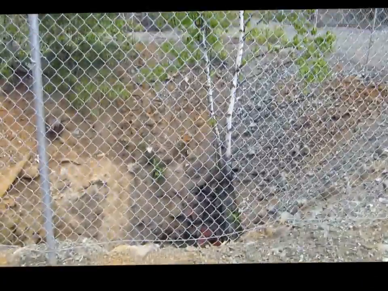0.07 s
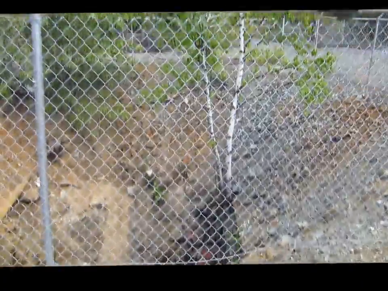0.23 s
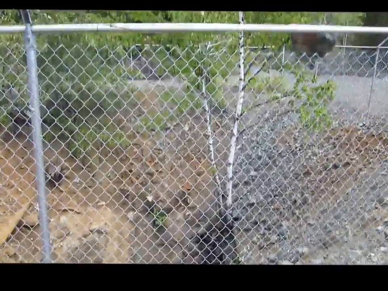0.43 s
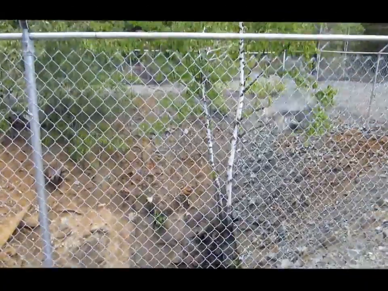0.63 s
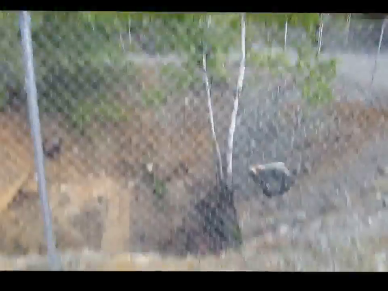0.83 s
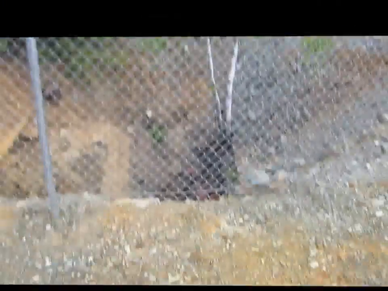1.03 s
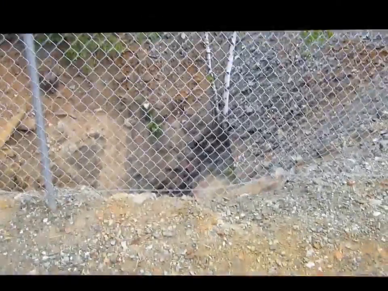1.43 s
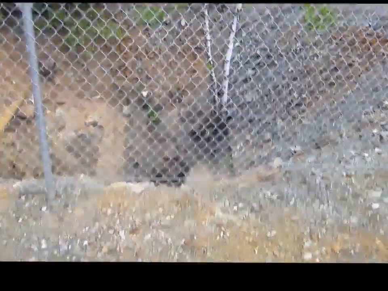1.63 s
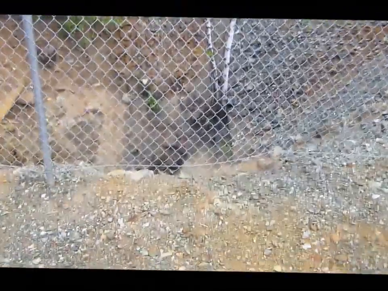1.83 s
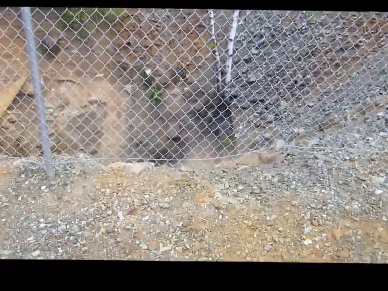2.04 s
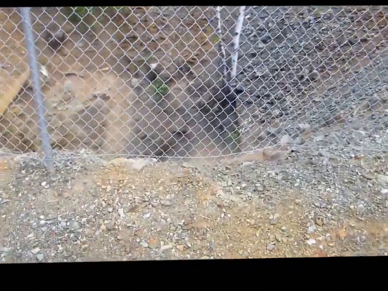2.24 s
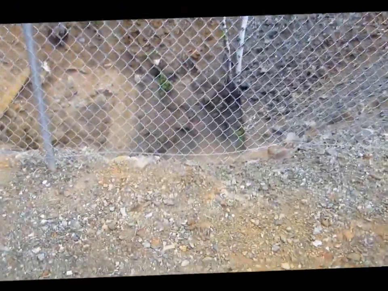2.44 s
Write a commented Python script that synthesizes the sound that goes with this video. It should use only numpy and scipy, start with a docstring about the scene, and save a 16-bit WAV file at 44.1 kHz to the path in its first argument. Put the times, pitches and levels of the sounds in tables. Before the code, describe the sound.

Outdoors, a jolted chain-link fence gives a loud metallic rattle and sways on with light jingling and ringing wires. A rock lands with a sharp crack and bounces down a slope with several knocks and one low boom.

```python
"""A chain-link fence clashes, jolted as a rock is thrown over it into a pit, outdoors.
The mesh sways on: its links chafe, tick and clink, and its wires chirp and ring.
The rock cracks on the stony rim, then knocks and thuds on down the slope, with one deep boom.
A faint outdoor rumble lies underneath."""
import sys
import numpy as np
from scipy import signal
from scipy.fft import rfft, irfft
from scipy.io import wavfile
from scipy.ndimage import map_coordinates

SR = 44100
rng = np.random.default_rng(int(sys.argv[2]) if len(sys.argv) > 2 else 0)


def dump(signal):
    """Clip the signal to [-1, 1] and save it as 16-bit WAV at the path in sys.argv[1]."""
    limited = np.clip(np.atleast_2d(signal).T, -1, 1)
    pcm = np.round(limited * 32767).astype(np.int16)
    wavfile.write(sys.argv[1], SR, pcm)


N = 110250
T = np.arange(N) / SR
CHAFE_CONTACTS_PER_S, CHAFE_SPREAD_DB = 5000, 2.5

# sheets of links slapping together: start_s, body_db, treble_db, rise_s, t60_s
CLASHES = [(0.188, -33, -33, 0.01, 0.29), (0.206, -34, -31, 0.0093, 0.28), (0.246, -24, -20, 0.0036, 0.15),
           (0.268, -34, -23, 0.0088, 0.23), (0.286, -14.5, -17, 0.0033, .12),
           (0.303, -14.5, -30, 0.0065, 0.22), (0.332, -18, -24, 0.011, 0.092),
           (0.386, -23, -37, 0.0026, 0.14), (0.423, -24, -42, 0.0058, 0.28),
           (0.45, -22.5, -22.5, 0.02, 0.12), (0.545, -20.5, -29, 0.0011, 0.089),
           (0.598, -19.5, -29.5, 0.0016, 0.12), (0.624, -34, -36.5, 0.0038, 0.51),
           (0.839, -37, -32.5, 0.0069, 0.26), (0.879, -36.5, -31.5, .002, 0.14),
           (1.011, -61, -33, 0.0099, 0.26), (1.748, -30.5, -47, 0.0025, 0.085),
           (1.972, -27.5, -43, 0.0018, 0.044), (2.235, -34, -67, 0.036, 0.26)]
# spectrum of rubbing links: freq_hz, level_db
CHAFE_COLOUR = [(100, -46), (300, -7.5), (500, -12), (850, -1.5), (1700, 0.5), (2750, 1.5), (3500, 0),
                (4400, 2.5), (5600, 0.5), (7500, -6.5), (10500, -3.5), (11800, -5.5), (13500, -9.5),
                (15500, -17.5)]


def from_db(db):
    """Decibels to gain."""
    return 10 ** (np.asarray(db) / 20)


def rms_one(x):
    """Scale to rms 1."""
    return x / np.sqrt(np.mean(x ** 2) + 1e-20)


def colour(x, spectrum):
    """Shape x by (freq_hz, level_db) points; rms 1."""
    hz, db = np.transpose(spectrum)
    bins_hz = np.maximum(np.arange(N // 2 + 1) * SR / N, 1)
    gain = from_db(np.interp(np.log(bins_hz), np.log(hz), db))
    return rms_one(irfft(rfft(x) * gain, N))


def noise(spectrum):
    """Coloured noise; rms 1."""
    return colour(rng.standard_normal(N), spectrum)


def contacts(per_s, spread_db):
    """Random clicks of uneven size; rms 1."""
    sizes = from_db(spread_db * np.minimum(rng.exponential(1, N), 5)) * rng.choice([-1, 1], N)
    return rms_one(sizes * (rng.random(N) < per_s / SR))


def clicks(times_s, gains):
    """One click at each time."""
    return np.bincount((np.asarray(times_s) * SR).astype(int), gains, N)[:N]


def burst(start_s, t60_s, rise_s=0):
    """Envelope: linear rise to 1, exponential decay."""
    rise_s = max(rise_s, 1 / SR)
    attack = np.clip((T - start_s) / rise_s, 0, 1)
    return attack * np.exp(-np.log(1000) * np.clip((T - start_s - rise_s) / t60_s, 0, 10))


def ring(x, hz, t60_s):
    """One mode: a unit click starts a decaying sine of height 1."""
    r, w = np.exp(-np.log(1000) / (t60_s * SR)), 2 * np.pi * hz / SR
    return signal.lfilter([0, np.sin(w)], [1, -2 * r * np.cos(w), r * r], x + 1e-18)


def air():
    """Low outdoor rumble, ducked after the fence crash and recovering, as by a recorder's gain control."""
    # gain dip and recovery: time_s, level_db
    ducking = [(0.1, -52.5), (0.75, -62.5), (1.4, -56.5), (1.65, -50), (2.5, -51)]
    # rumble spectrum: freq_hz, level_db
    spectrum = [(20, -5), (70, -5), (170, -5), (290, -2.5), (480, -5.5), (3000, -17.5), (15000, -23)]
    return from_db(np.interp(T, *np.transpose(ducking))) * noise(spectrum)


def jingle(link_count=90):
    """Small strikes land at random on many links, each with its own pitch; rms 1."""
    strikes = contacts(per_s=240, spread_db=1.0)
    struck_link = rng.integers(0, link_count, N)
    pitches_hz = rng.uniform(1203, 13500, link_count)
    rings = sum(ring(strikes * (struck_link == k), hz, t60_s=0.13) for k, hz in enumerate(pitches_hz))
    return colour(rings, CHAFE_COLOUR)


def chafing(flurry_share=.45):
    """Links rub in small flurries as the mesh sways, and keep the wire singing."""
    # rubbing envelope: time_s, level_db
    sway = [(0, -48.5), (.06, -51.5), (.18, -52.5), (.25, -30.5), (.52, -34.5), (.66, -33.5), (.76, -38),
            (.92, -37.5), (1.15, -36), (1.26, -38), (1.55, -39), (1.6, -36), (1.72, -38.5), (1.89, -36.5),
            (2.08, -39.5), (2.27, -38.5), (2.315, -46.5), (2.42, -39), (2.5, -46)]
    # rubbed wire modes: pitch_hz, relative_db, t60_s
    modes = [(2783, -20, .1), (4115, -11.5, .3), (5491, -26, .2), (11570, -19, .1)]
    starts = np.abs(contacts(per_s=110, spread_db=2.0))
    flurries = np.abs(signal.fftconvolve(starts, burst(0, t60_s=.1) ** 2)[:N])
    flutter = np.sqrt(1 - flurry_share + flurry_share * flurries / flurries.mean())
    level = from_db(np.interp(T, *np.transpose(sway))) * flutter
    grain = contacts(CHAFE_CONTACTS_PER_S, CHAFE_SPREAD_DB)
    out = level * (colour(grain, CHAFE_COLOUR) + from_db(-4) * jingle())
    drive = level * grain * (T > CLASHES[0][0])  # from the first clash on
    for hz, db, t60_s in modes:
        to_drive_rms = np.sqrt(4 * np.log(1000) / (t60_s * SR))
        out += from_db(db) * to_drive_rms * ring(drive, hz, t60_s)
    return out


def clinks():
    """Loose links chatter briefly, each group around its own pitch."""
    # link groups: start_s, pitch_hz, width_hz, level_db, t60_s
    groups = [(.079, 11500, 2600, -45, 0.32), (0.209, 2860, 400, -24, .2), (.268, 3780, 450, -24, 0.15),
              (1.047, 9100, 400, -31, 0.032), (1.324, 2804, 200, -34, 0.13),
              (1.615, 10860, 500, -30, 0.043), (1.615, 5560, 1300, -32, 0.091),
              (2.127, 4520, 500, -28.5, 0.15)]
    out = np.zeros(N)
    for start_s, hz, width_hz, db, t60_s in groups:
        band = signal.butter(2, [hz - width_hz / 2, hz + width_hz / 2], "band", fs=SR, output="sos")
        chatter = rms_one(signal.sosfilt(band, rng.standard_normal(N)))
        out += from_db(db) * burst(start_s, t60_s, rise_s=0.0039) * chatter
    return out


def wire_cluster(times_s, strike_db, lowest_hz, step_hz, loss_db, t60_s):
    """Ten close, beating wire modes; higher ones lie wider apart, are weaker and die sooner."""
    out = np.zeros(N)
    for k in range(10):
        late_s, uneven_db = rng.uniform([0, -2], [.003, 2], (len(times_s), 2)).T
        strikes = clicks(times_s + late_s, from_db(strike_db - loss_db * k + uneven_db))
        out += ring(strikes, lowest_hz + step_hz * k ** 1.45, t60_s / (1 + k / 2))
    return out


def waver(x, depth_s=.00002, rate_hz=11):
    """Swaying changes the wire's tension, so its pitch wanders slightly."""
    lowpass = signal.butter(2, rate_hz, fs=SR, output="sos")
    drift = rms_one(signal.sosfilt(lowpass, rng.standard_normal(N)))
    return map_coordinates(x, [(T + depth_s * drift) * SR], order=5, mode="nearest")


def ticks():
    """A slipping link rings two mode clusters and shakes a spray of contacts from its neighbours."""
    # link slips, levels before each part's trim: start_s, spray_db, low_ring_db, high_ring_db
    slips = [(0.249, -28, -35, -34), (0.287, -6.5, -18.5, -19), (0.3485, -18, -22.5, -23),
             (0.4214, -14, -42, -25), (0.4553, -16.5, -22, -23), (0.597, -21, -26, -29),
             (0.7707, -31, -29.5, -25), (0.901, -16, -29, -20.5), (0.932, -25, -29, -21.5),
             (0.9564, -39, -25, -23), (1.144, -24, -31, -49), (1.2191, -29, -34.5, -32.5),
             (1.344, -17, -35, -37), (1.4552, -44, -31.5, -29.5), (1.616, -20, -35, -41),
             (1.7718, -20, -35.5, -31), (1.8577, -19, -28.5, -27), (1.8806, -14, -27.5, -32),
             (1.9189, -23, -29.5, -34), (1.9565, -21, -27.5, -31), (2.0106, -33, -30.5, -50),
             (2.128, -14, -25.5, -25), (2.1656, -24, -26, -40), (2.18, -21, -28, -25.5),
             (2.3306, -21, -32, -34.5), (2.357, -43, -31, -40)]
    # spray spectrum: freq_hz, level_db
    spray_colour = [(300, -15), (2800, 8), (3700, -2), (4600, 5), (7500, 1), (12000, 3), (15500, -15)]
    times_s, spray_db, low_db, high_db = np.transpose(slips)
    low = wire_cluster(times_s, low_db - 5.3, lowest_hz=4106, step_hz=28, loss_db=2.0, t60_s=.62)
    high = wire_cluster(times_s, high_db - 7.5, lowest_hz=11550, step_hz=38, loss_db=1.0, t60_s=.13)
    rings = waver(low + high)
    spray_power = sum((from_db(db - 12.5) * burst(start_s, t60_s=.1, rise_s=0.0024)) ** 2
                      for start_s, db in zip(times_s, spray_db))
    spray = colour(contacts(CHAFE_CONTACTS_PER_S, CHAFE_SPREAD_DB), spray_colour)
    return rings + np.sqrt(spray_power) * spray


def zings(low_hz=4080, high_hz=11360, travel_s=0.001133):
    """High waves run faster along a taut wire, so a snap arrives as a chirp falling to its pitch."""
    # wire snaps: start_s, low_db, high_db
    snaps = [(0.287, -6, -12), (.331, -0.5, -22), (.349, -5.5, -13), (0.385, -8.5, -24), (.901, -15.5, -20),
             (1.7732, -26, -13), (2.128, -27, -24)]
    times_s, low_db, high_db = np.transpose(snaps)
    dispersed_s = np.sqrt(T * (T + 2 * travel_s))
    fade = burst(0, t60_s=0.017) * np.sqrt(travel_s / (T + travel_s))
    out = np.zeros(N)
    for hz, db, cutoff_hz in ((low_hz, low_db, 7500), (high_hz, high_db, 14000)):
        pitch_hz = hz * (T + travel_s) / (dispersed_s + 1e-9)
        chirp = np.sin(2 * np.pi * hz * dispersed_s) * fade / (1 + (pitch_hz / cutoff_hz) ** 10)
        out += signal.fftconvolve(clicks(times_s, from_db(db)), chirp)[:N]
    return out


def clashes(crossover_hz=5280, frame_db=-44):
    """Swarms of link contacts swell and die, and set the frame ringing."""
    # swarm spectrum: freq_hz, level_db
    spectrum = [(40, -24), (120, -23.5), (290, -10), (500, -18), (720, -6.5), (1220, -4.5), (1900, -1.5),
                (2640, -1), (3400, -5.5), (4400, -2), (6000, -5), (8300, -14.5), (10500, -9.5),
                (11800, -10.5), (13500, -17), (15500, -23)]
    # modes of the frame and stretched wires: pitch_hz, relative_db
    modes = [(1193, 0), (1796, -2), (2040, -2), (2567, -1), (2609, -2), (2704, 0), (3807, -1), (4469, -1),
             (4596, -2), (4772, 2)]
    swarm = colour(contacts(per_s=22000, spread_db=2), spectrum)
    body = signal.sosfiltfilt(signal.butter(2, crossover_hz, fs=SR, output="sos"), swarm)
    body_power, treble_power = np.zeros((2, N))
    for start_s, body_db, treble_db, rise_s, t60_s in CLASHES:
        envelope = burst(start_s, t60_s, rise_s)
        body_power += (from_db(body_db) * envelope) ** 2
        treble_power += (from_db(treble_db) * envelope) ** 2
    mesh = np.sqrt(body_power) * rms_one(body) + np.sqrt(treble_power) * rms_one(swarm - body)
    drive = np.sqrt(body_power) * rng.standard_normal(N)
    frame = sum(from_db(db) * rms_one(ring(drive, hz, t60_s=.2)) for hz, db in modes)
    return mesh + from_db(frame_db) * rms_one(frame)


def boom(start_s=1.592, pitch_hz=65, level_db=-33):
    """A deep boom from the pit: one low, quickly damped swell."""
    tone = np.sin(2 * np.pi * pitch_hz * (T - start_s))
    return from_db(level_db) * burst(start_s, t60_s=.14, rise_s=.02) * tone


def pressure_pulse(hit, pitch_hz, t60_cycles=2.9):
    """A blow's push and pull on the air, a few cycles long, without bass."""
    band_hz = np.clip([0.6 * pitch_hz, 4.5 * pitch_hz], 20, SR / 3)
    push = signal.sosfilt(signal.butter(2, band_hz, "band", fs=SR, output="sos"), hit + 1e-18)
    return ring(push, pitch_hz, t60_cycles / pitch_hz)


def rock(stone_relative_db=-24.5, gravel_relative_db=-28):
    """Blows and one echo: pressure pulse, stony ring, crushed grit, scattered gravel, ground thud."""
    # rock impacts, plus a short echo at 1.114 s just after the main crack:
    # start_s, level_db, pitch_hz, grit_relative_db, thud_db
    blows_and_echo = [(1.1031, -9.5, 3640, 0.5, -60), (1.1042, 6.5, 2000, -5, -31),
                      (1.114, -15, 2500, -3, -53), (1.295, -19, 835, -20, -58), (1.349, -29, 375, -24, -66),
                      (1.485, -14.5, 1350, -25, -47), (1.4884, -14.5, 1440, -26, -47),
                      (1.597, -27, 510, -10, -38), (1.759, -28, 473, -12, -39.5),
                      (1.960, -13, 900, -24, -48), (2.189, -26, 690, -8, -70),
                      (2.2495, -8, 1000, -27, -41.5)]
    # modes of the struck stone: pitch_hz, relative_db, t60_s
    modes = [(930, 0, .022), (2600, 4, .009), (3270, 3, .014)]
    # grit, gravel and ground spectra: freq_hz, level_db
    grit_colour = [(500, -10), (3500, 11), (6500, 3.5), (10500, 10.5), (13000, -1), (15500, -11)]
    gravel_colour = [(150, -6), (650, -18), (900, 6), (2200, 10), (3300, -2), (5500, -7), (14000, -31)]
    thud_colour = [(25, -6), (60, -1), (120, 2), (260, -2), (450, -9.5), (1200, -22.5)]
    grit, gravel, thud = noise(grit_colour), noise(gravel_colour), noise(thud_colour)
    out = np.zeros(N)
    for start_s, db, pitch_hz, grit_relative_db, thud_db in blows_and_echo:
        hit = clicks([start_s], [from_db(db)])
        out += pressure_pulse(hit, pitch_hz)
        for k, (mode_hz, mode_db, t60_s) in enumerate(modes):
            out -= (-1) ** k * from_db(stone_relative_db + mode_db) * ring(hit, mode_hz, t60_s)
        out += from_db(db + grit_relative_db) * burst(start_s, t60_s=0.0026) * grit
        out += from_db(db + gravel_relative_db) * burst(start_s, t60_s=.035) * gravel
        out += from_db(thud_db) * burst(start_s, t60_s=0.1, rise_s=0.002) * thud
    return out


def scene():
    """Fence, rock and open air, in mono."""
    fence = clashes() + chafing() + ticks() + zings() + clinks()
    return (fence + rock() + boom() + air())[None]


def record(dry):
    """Clip at full scale, then cut the top treble."""
    stopband_db, stopband_hz = 65, 16365
    lowpass = signal.cheby2(14, stopband_db, stopband_hz, fs=SR, output="sos")
    return signal.sosfilt(lowpass, np.clip(dry, -1, 1))


dry = scene()
out = record(dry)
dump(out)
```